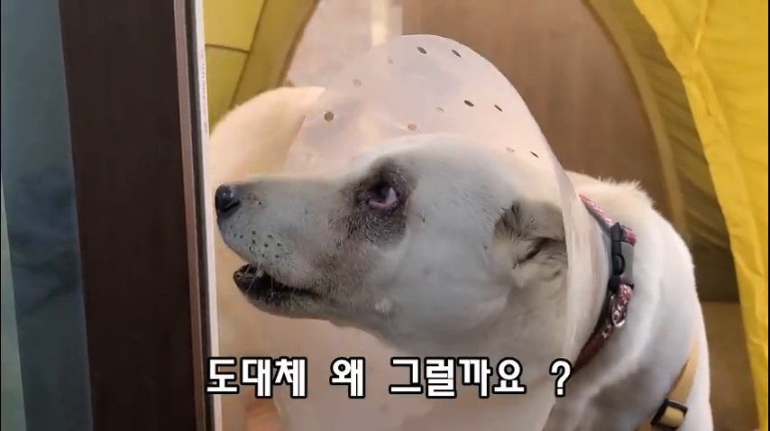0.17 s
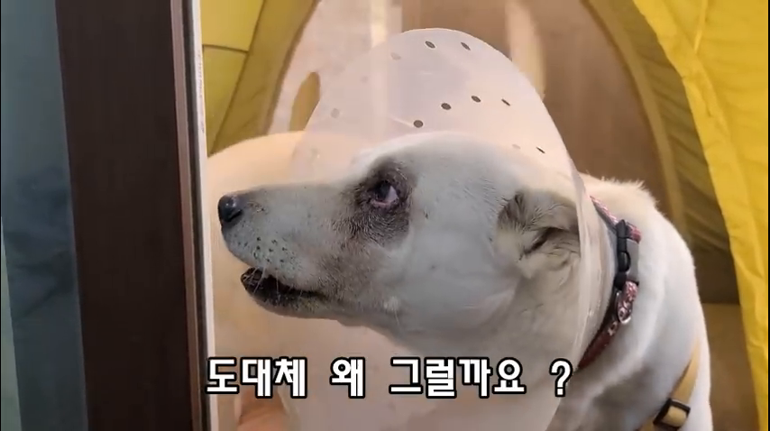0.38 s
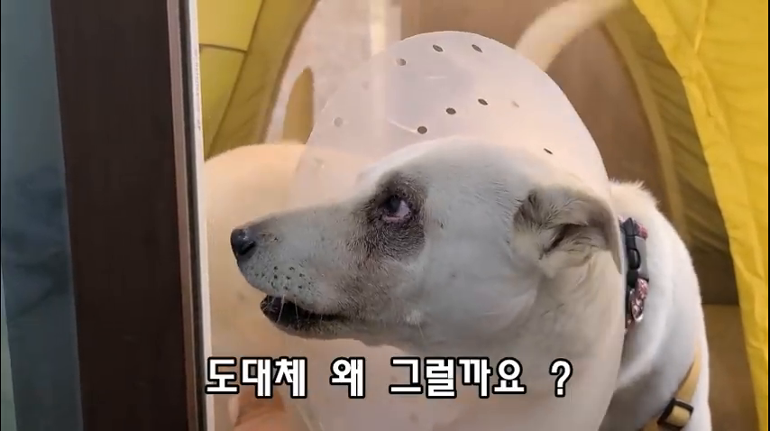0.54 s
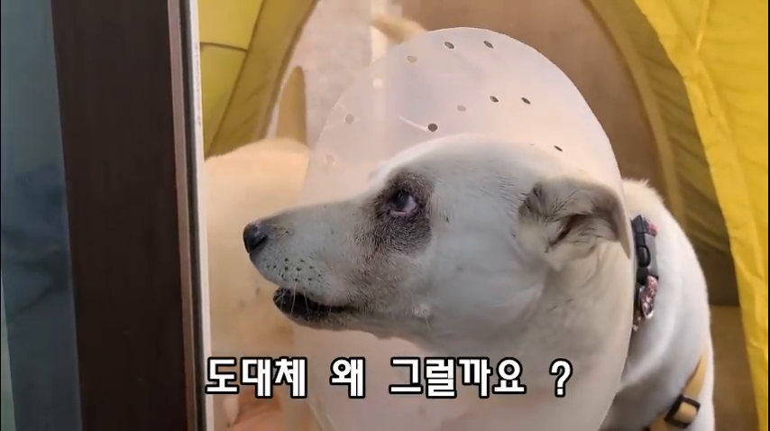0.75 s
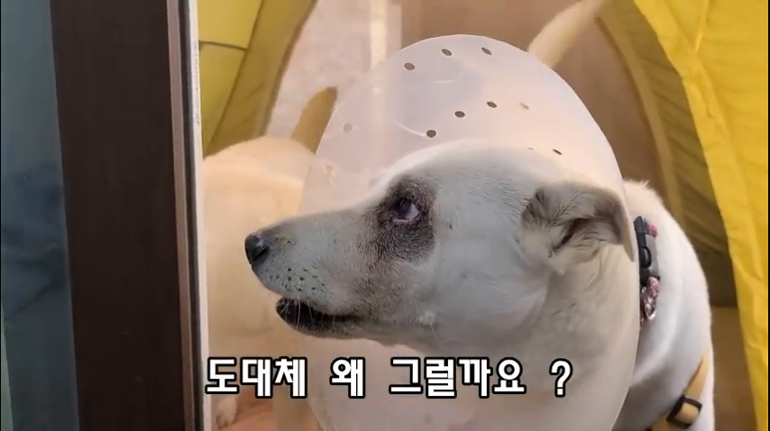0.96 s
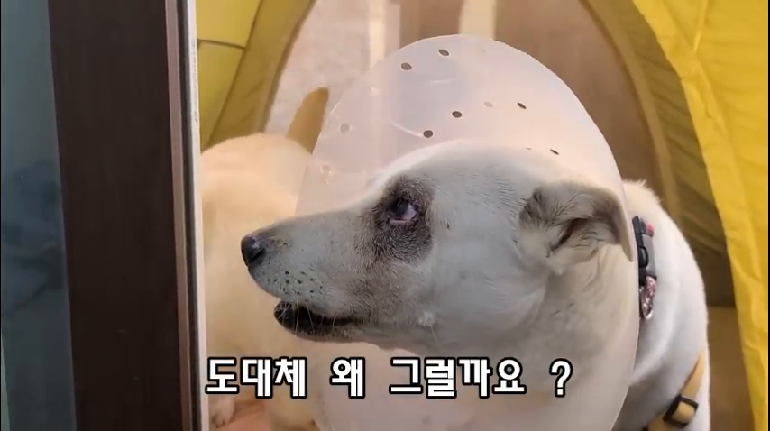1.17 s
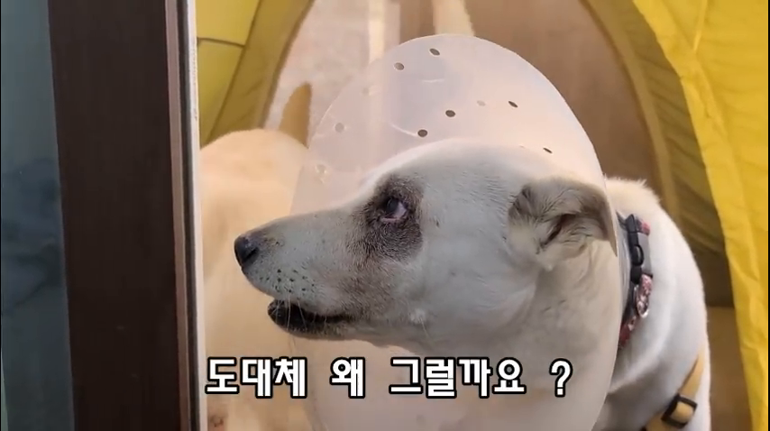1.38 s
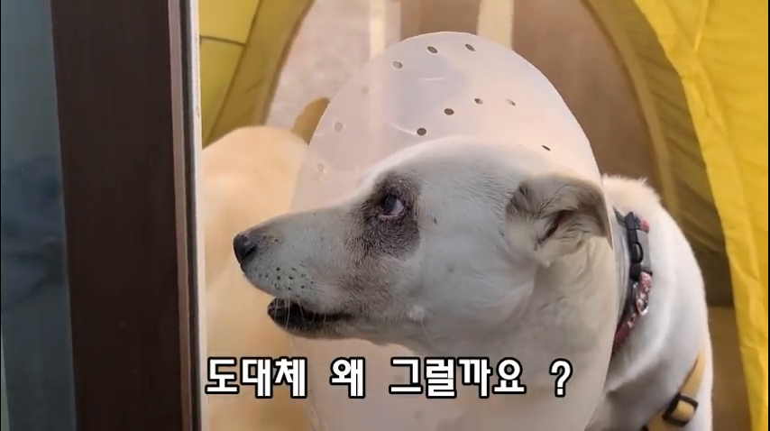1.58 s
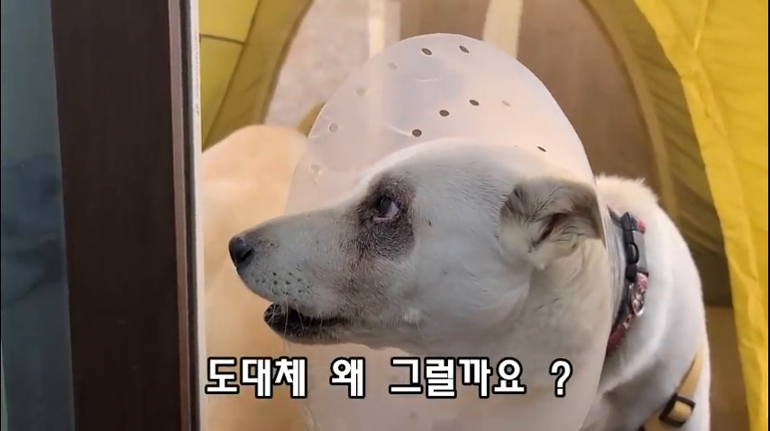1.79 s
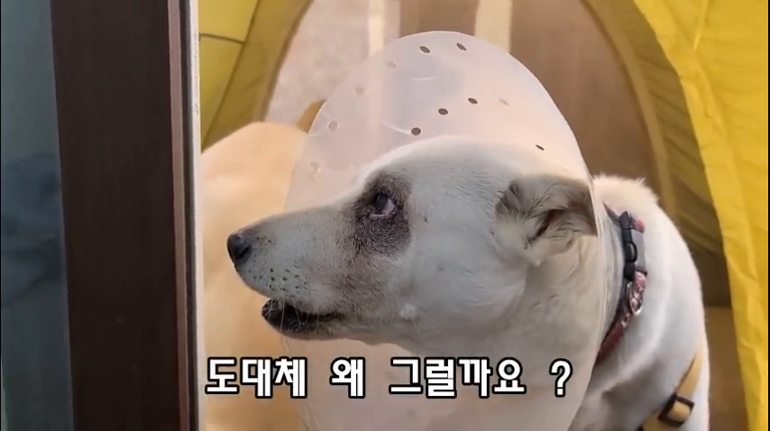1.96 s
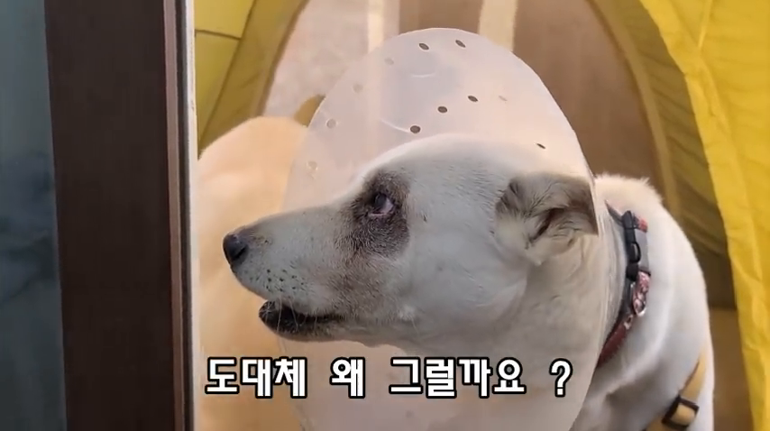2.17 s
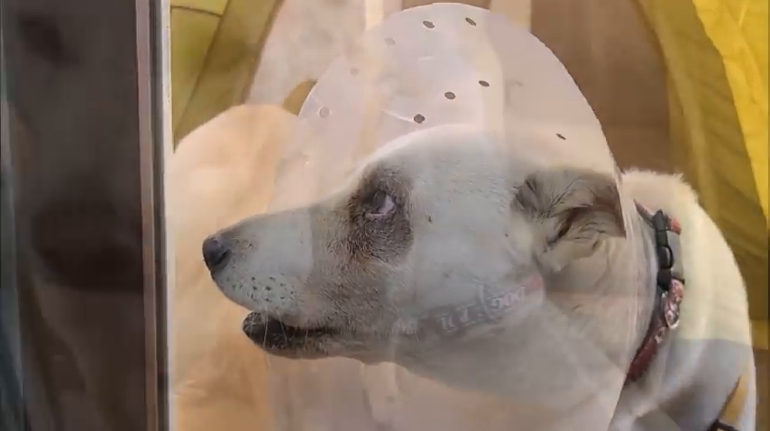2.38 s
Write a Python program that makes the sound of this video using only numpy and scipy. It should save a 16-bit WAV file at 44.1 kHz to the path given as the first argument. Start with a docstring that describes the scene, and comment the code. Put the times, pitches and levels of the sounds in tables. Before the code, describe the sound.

A dog's rising yelp sinks into a moan, followed by a brief fluttering growl.

```python
"""First you hear a dog, close by in a quiet room, grumbling at another dog. Its voice swoops up into one
hissing yelp and sinks to a low moan. It draws air, then gives a short fluttering growl; at 2.33 s the sound
breaks off sharply and the background drops. The voice comes from vocal folds that beat and make the throat and
mouth ring; the hiss is air passing bared teeth. The cone the dog wears scatters the sound, and faint metallic
copies sit in the treble."""
import sys
import numpy as np
from scipy import signal
from scipy.fft import rfft, irfft, next_fast_len
from scipy.io import wavfile
from scipy.ndimage import map_coordinates

SR = 44100
rng = np.random.default_rng(int(sys.argv[2]) if len(sys.argv) > 2 else 0)


def materialize(psi):
    """Save the field psi as 16-bit PCM at rate SR to the path in sys.argv[1].

    A 1-D psi becomes a single channel; in a 2-D psi each row is a channel.
    """
    bounded = np.clip(np.atleast_2d(psi).T, -1, 1)
    quanta = np.round(bounded * 32767).astype(np.int16)
    wavfile.write(sys.argv[1], SR, quanta)


N = 107118


def amp(db):
    """Turn decibels into a gain."""
    return 10 ** (np.asarray(db) / 20)


def unit(x):
    """Scale to an average (rms) size of 1."""
    return x / np.sqrt(np.mean(x ** 2) + 1e-20)


def clock():
    """The time of each sample."""
    return np.arange(N) / SR


def along(points, hz):
    """Read a table between its frequencies, on a log scale."""
    f, v = np.transpose(points)
    return np.interp(np.log(hz + 1), np.log(f + 1), v)


def curves(rows):
    """One value per sample for each column after the time."""
    times, *columns = np.transpose(rows)
    return [np.interp(clock(), times, column) for column in columns]


def wobble(rate):
    """A smooth curve through rate random points a second."""
    return map_coordinates(rng.standard_normal(int(N * rate / SR) + 4), [clock() * rate])


def until(end_s, fade_s):
    """Stay at 1, then fade to reach 0 at end_s."""
    return np.clip((end_s - clock()) / fade_s, 0, 1)


def filtered(x, response):
    """Give each frequency in x the gain response(hz)."""
    size = next_fast_len(N + SR // 2)
    return irfft(rfft(x, size) * response(np.fft.rfftfreq(size, 1 / SR)), size)[..., :N]


# How alike noise is on the left and right: f/Hz, likeness/0-1
AIR_LIKENESS = [(30,.5),(100,0.9),(600,.9),(2000,0.62),(4000,.1),(15000,.1)]
def air(colour, gate=1):
    """Stereo noise, chopped by gate, then given a colour (a level for each frequency)."""
    def response(hz):
        spread = np.arccos(np.clip(along(AIR_LIKENESS, hz), -1, 1)) / 2
        return amp(along(colour, hz)) * [np.cos(spread), np.sin(spread)]
    mid, side = filtered(gate * rng.standard_normal((2, N)), response)
    return unit(np.array([mid + side, mid - side]))


def harmonics(phase, pitch, colour, count, hold_db=-13):
    """One second of tones at multiples of the pitch, kept level except in the colour's deep dips."""
    k = np.arange(1, count + 1)[:, None]
    gains = amp(along(colour, k * pitch[:SR]))
    tone = (gains * np.cos(k * phase[:SR] + k * k / 2)).sum(0)
    strength = np.sqrt(((gains ** 2).sum(0) + amp(hold_db) ** 2) / 2)
    return np.pad(tone / strength, (0, N - SR))


def ring_out(pulses, colour, size=4096):
    """Each pulse sets off a ring of the given colour."""
    cepstrum = irfft(np.log(amp(along(colour, np.fft.rfftfreq(size, 1 / SR)))))
    one_sided = 2 * cepstrum[:size // 2] * (np.arange(size // 2) > 0)  # no ringing before the pulse
    ring = irfft(np.exp(rfft(one_sided, size)))
    return signal.fftconvolve(pulses, ring)[:N]


# Colour of the room's rumble: f/Hz, level/dB
RUMBLE_COLOUR = [(15,-35.5),(25,-10.5),(75,2.5),(110,-7.5),(160,-12.5),(240,-20.5),(340,-18),(450,-13),(690,-27.5),(1200,-29.5),(2500,-29),(4300,-34.5),(6500,-54),(9000,-47),(12000,-42),(15500,-49)]
# Tones of the hum: f/Hz, level/dB
HUM_TONES = [(199.5,-73.5),(283,-77.5),(495,-83)]
def room(rumble_db=-64, drop_db=-14):
    """A low rumble and a faint hum; both drop away as the growl ends."""
    hum = sum(np.sqrt(2) * amp(db) * np.sin(2 * np.pi * hz * clock() + .5 * wobble(2.7))
              for hz, db in HUM_TONES)
    rumble = amp(rumble_db + 1.2 * wobble(8)) * air(RUMBLE_COLOUR)
    return (rumble + hum) * amp(drop_db * (1 - until(2.38, .06)))


# Loudness of the breath in: t/s, level/dB
INHALE_LEVEL = [(0,-100),(.9,-86.5),(1.45,-80.5),(1.6,-70),(1.76,-65.5),(1.84,-70),(1.88,-63),(1.95,-85)]
# Its colour: f/Hz, level/dB
INHALE_COLOUR = [(100,-25.5),(300,-6.5),(500,0.5),(650,-6.5),(850,-16.5),(1600,-18.5),(2100,-20),(2550,-15),(3200,-26.5),(4500,-26),(6000,-42.5),(15000,-45.5)]
def inhale():
    """The dog draws air softly before it growls."""
    level_db, = curves(INHALE_LEVEL)
    return amp(level_db + 1.3 * wobble(35)) * air(INHALE_COLOUR)


# Loudness of the lip noise: t/s, level/dB
LIP_LEVEL = [(.7,-100),(.725,-66),(.745,-58),(.77,-69),(.85,-93),(.9,-110)]
# Its colour: f/Hz, level/dB
LIP_COLOUR = [(300,-11),(1000,0),(1400,2),(2000,-6),(2550,-0.5),(3500,-7.5),(4700,-10),(5400,-7.5),(6000,-20),(15000,-28.5)]
def lips():
    """The lips settle softly as the moan dies."""
    level_db, = curves(LIP_LEVEL)
    return amp(level_db) * air(LIP_COLOUR)


def cone_scatter(voice, level_db=-18, decay_s=.041):
    """The cone collar scatters the voice into a short echo, opposite on the left and right."""
    t = np.arange(SR // 8) / SR
    tail = rng.standard_normal(len(t)) * amp(-60 * t / decay_s)
    echo = signal.fftconvolve(voice.mean(0), tail / np.linalg.norm(tail))[:N]
    return amp(level_db) * echo * np.array([[1], [-1]])


GROWL_S, GROWL_END_S, GROWL_HZ = 1.9245, 2.329, 118.7
# Catches, moments when the throat goes slack: t/s, drop in beat level/dB
CATCHES = [(1.938,0),(1.976,7),(2.004,1.5),(2.039,1.5),(2.071,-1.5),(2.106,9),(2.145,7.5),(2.183,7),(2.219,1),(2.254,3),(2.298,1.5)]
# Colour of the ringing throat: f/Hz, level/dB
THROAT_COLOUR = [(60,-44.5),(170,-16),(240,-12),(295,-21),(345,-12.5),(410,2),(470,0),(525,2),(590,-9),(680,-21.5),(770,-33.5),(920,-24),(1150,-53),(1330,-28),(1600,-48),(1830,-33.5),(2050,-47),(2250,-43),(2500,-46),(3000,-63.5)]
# Colour of the growl's raspy air: f/Hz, level/dB
GROWL_AIR_COLOUR = [(30,-9),(90,1),(300,-1.5),(900,1.5),(1050,-9),(1170,-29.5),(1350,0.5),(1600,-8.5),(1850,-1),(2080,-11),(2250,1),(2550,-19),(3030,-5.5),(3250,-19.5),(3800,-23.5),(5500,-26),(6500,-31),(10000,-34),(15500,-32.5)]
def growl(rise_s=.026, jitter_s=.0003, scatter_db=1.47, catch_s=.0046, lag_s=.0028, recover_s=.02):
    """Uneven beats of the vocal folds ring the throat; at a catch they weaken, lag, then hurry on."""
    t = clock()
    length_s = GROWL_END_S - GROWL_S
    slack_db = sum(depth * np.exp(-((t - s) / catch_s) ** 2) for s, depth in CATCHES)
    swell = (t - GROWL_S) / rise_s
    effort = amp(26 * np.minimum(swell, 0)) * np.clip((swell + 1) * 10, 0, 1)
    beats = GROWL_S + (np.arange(int(length_s * GROWL_HZ) + 6) - 4) / GROWL_HZ
    chance = rng.standard_normal((len(beats), 2))
    lag = sum((beats > s) * np.exp(-abs(beats - s) / recover_s) for s, _ in CATCHES)
    times = beats + jitter_s * chance[:, 0] + lag_s * (lag - .4)
    sizes = amp(scatter_db * chance[:, 1] - np.interp(beats + .003, t, slack_db))
    pulses = np.bincount((times * SR).astype(int), sizes, N)[:N]
    throat = unit(ring_out(pulses, THROAT_COLOUR)) * np.sqrt(length_s * SR / N)
    phase = 2 * np.pi * GROWL_HZ * (t - GROWL_S) + .37 * wobble(50)
    chest = np.sqrt(2) * (np.cos(phase) + amp(-12) * np.cos(2 * phase)) * amp(-.15 * slack_db)
    rasp = air(GROWL_AIR_COLOUR, 1 - .3 * np.cos(phase)) * amp(-.2 * slack_db)
    return effort * (amp(-21.5) * throat + amp(-31) * chest + amp(-43) * np.sqrt(effort) * rasp)


# Loudness of the hiss: t/s, level/dB
HISS_LEVEL = [(0,-48.5),(.03,-59),(.07,-58),(.12,-43),(.14,-35),(.168,-25),(.19,-26.5),(.205,-34),(.23,-33.5),(.27,-49.5),(.31,-61),(.4,-71),(.72,-72.5),(.8,-87.5)]
# Its colour: f/Hz, level/dB
HISS_COLOUR = [(25,-4),(70,-0.5),(150,-9),(600,-9),(1200,-7),(2300,-6),(3200,-3),(6000,-2.5),(9000,-7),(12000,-9),(15500,-15)]
def teeth_hiss(puffs):
    """Puffs of air hiss through the bared teeth."""
    level_db, = curves(HISS_LEVEL)
    return amp(level_db) * air(HISS_COLOUR, puffs)


def voice_crack(phase, at_s=.183, width_s=.014, level_db=-27.5):
    """At the top of the yelp the folds repeat only every second beat, adding a tone an octave down."""
    halves = np.cos(phase / 2) + amp(-8) * np.cos(3 * phase / 2) + amp(-16) * np.cos(5 * phase / 2)
    return amp(level_db) * np.exp(-((clock() - at_s) / width_s) ** 2) * halves


# Loudness of the chest tone while the pitch is low: t/s, level/dB
CHEST_LEVEL = [(0,-42.5),(.104,-35),(.132,-46.5),(.228,-50),(0.269,-41.5),(.4,-39.5),(0.531,-31.5),(.714,-33.5),(.742,-36),(0.767,-55.5),(0.799,-63.5)]
# Its colour: f/Hz, level/dB
CHEST_COLOUR = [(60,12),(115,3.5),(170,-6.5),(245,0),(300,-11),(380,-40),(600,-90)]
def chest_tone(phase, pitch, top_hz=330):
    """The chest hums with the voice, fading when the pitch passes top_hz."""
    level_db, = curves(CHEST_LEVEL)
    return amp(level_db) * harmonics(phase, pitch, CHEST_COLOUR, count=3) / (1 + (pitch / top_hz) ** 10)


# Pitch of the voice: t/s, f/Hz
PITCH = [(0,188.1),(.042,164.6),(.078,185.2),(.1,225.4),(.113,256.1),(.126,371.7),(.138,467.6),(.15,546),(.165,562.7),(.184,598.4),(.207,616.2),(.222,513),(.24,345.3),(.26,202),(.28,171.3),(.302,154.7),(.37,141.2),(.448,130.4),(.604,119.9),(.718,110.9),(.775,92.1)]
# How rough the voice is: t/s, roughness/0-1
ROUGHNESS = [(0,0.22),(0.048,0.09),(.1,0.15),(.128,0.41),(0.144,0.04),(.21,.01),(.24,.08),(.265,0.32),(.31,0.09),(.41,0.08),(.445,0.39),(.52,0.2),(.57,.06),(.605,0.26),(.64,0.1),(0.699,0.1),(.75,0.64)]
# Loudness of the mouth's ring: t/s, level/dB
MOUTH_LEVEL = [(0,-13.5),(0.021,-33),(.055,-30),(.08,-17),(.1,-13.5),(.113,-12.5),(.125,-19.5),(.134,-10.5),(.144,-5.5),(.16,-6),(0.195,-8),(0.206,-19.5),(.213,-7),(.222,-9),(.23,-18),(.248,-20),(.264,-16.5),(.287,-27),(.41,-26),(0.509,-29.5),(0.601,-35.5),(0.636,-28.5),(0.709,-29),(.74,-42),(.78,-59.5),(.83,-65.5)]
# Its colour: f/Hz, level/dB
MOUTH_COLOUR = [(150,-74),(270,-31),(340,-11.5),(400,-3.5),(470,3.5),(540,-5.5),(610,-8),(665,-27),(760,-35),(880,-35.5),(1050,-59.5),(2000,-100)]
# Bright parts of the voice: t/s, overtone level/dB, rasp level/dB (before a 2.5 dB lift)
BRIGHT_LEVELS = [(0,-40.5,-48),(.056,-49,-58.5),(.098,-39,-43.5),(.12,-25,-28.5),(.133,-18,-21),(.143,-20,-31),(.154,-23,-26),(.164,-45.5,-28.5),(.186,-33.5,-30.5),(.204,-25.5,-28.5),(.215,-31.5,-35.5),(.226,-24.5,-34),(.246,-39,-44.5),(.27,-38,-50),(.316,-50,-62),(.38,-59.5,-65),(.56,-66.5,-62),(.66,-63.5,-62),(.78,-63.5,-64),(.82,-75,-74.5)]
# Overtone colours, mouth open and shut: f/Hz, level/dB
OVERTONES_OPEN = [(550,-58.5),(760,-13),(930,-9),(1035,4.5),(1095,-9.5),(1160,-20.5),(1240,-10),(1330,-6),(1450,-23.5),(1600,-35.5),(2500,-70)]
OVERTONES_SHUT = [(550,-51.5),(760,-6.5),(880,-3),(990,0),(1080,-18.5),(1170,-20.5),(1330,-7),(1450,-15),(1600,-29),(2500,-70)]
# Rasp colours, mouth open and shut: f/Hz, level/dB
RASP_OPEN = [(1000,-60.5),(1450,-18),(1680,1),(1850,-6),(2000,-15),(2230,-8.5),(2380,-13.5),(2530,1.5),(2700,-15),(3000,-15),(3300,-25),(4500,-41.5)]
RASP_SHUT = [(1000,-50),(1600,-13.5),(1760,-9.5),(1850,2),(1950,-13.5),(2300,-15.5),(2430,-6.5),(2540,2.5),(2680,-8.5),(3050,-10),(3500,-20.5),(4500,-36)]
def yelp_and_moan(shut_hz=149, open_hz=246):
    """The vocal folds speed up into a yelp and slow to a moan; the mouth opens as the pitch rises."""
    (pitch,), (rough,), (mouth_db,) = map(curves, (PITCH, ROUGHNESS, MOUTH_LEVEL))
    overtone_db, rasp_db = curves(BRIGHT_LEVELS)
    jitter = (.0052 + .032 * rough) * wobble(200)
    phase = 2 * np.pi * np.cumsum(pitch * (1 + jitter)) / SR
    puffs = 1 + .55 * np.cos(phase)  # one puff of air per beat
    opening = np.clip((pitch - shut_hz) / (open_hz - shut_hz), 0, 1)

    def voiced(colour, breath, count):
        """Mix a tone with puffing breath of the same colour."""
        tone = harmonics(phase, pitch, colour, count)
        return (tone + breath * air(colour, puffs)) / np.hypot(1, breath)

    mouth = amp(mouth_db) * voiced(MOUTH_COLOUR, .98 * rough, count=9)
    mouth *= 1 + .9 * rough * wobble(160)  # a rough voice flickers in level
    breath = .22 + .28 * rough
    overtones = opening * voiced(OVERTONES_OPEN, breath, count=10)
    overtones += (1 - opening) * voiced(OVERTONES_SHUT, 3 * breath, count=14)
    rasp = opening * voiced(RASP_OPEN, .28 + 1.8 * rough, count=16)
    rasp += (1 - opening) * voiced(RASP_SHUT, .7 + rough, count=28)
    bright = amp(overtone_db) * overtones + amp(rasp_db + 2.5) * rasp
    voice = chest_tone(phase, pitch) + mouth + bright + voice_crack(phase) + teeth_hiss(puffs)
    fade_in = 1 - until(.0043, .0041)
    return voice * fade_in * until(.85, .04)


def scene():
    """The dog in its cone, in the room; the sound breaks off sharply at the end of the growl."""
    voice = yelp_and_moan() + growl()
    dog = (voice + cone_scatter(voice)) * until(GROWL_END_S, .00086)
    return dog + lips() + inhale() + room()


# Metallic copies around 1, 2, 3 and 4 times copy_hz: level/dB
COPY_LEVELS = [-40.5,-46.5,-48,-52.5]
# How much louder the left side is: f/Hz, level/dB
LEFT_BOOST = [(100,-0.45),(500,0),(1100,4.5),(1700,-1),(2500,-7.5),(4000,-0.5),(7000,-2),(10000,-3.5),(15000,-2)]
# How far the left side's wave is ahead: f/Hz, phase/radians
LEFT_LEAD = [(100,0),(500,0.52),(1000,.5),(1700,1.41),(2500,2.5),(3400,2.2),(15000,-3.04)]
def record(dry, copy_hz=3900, top_hz=15800):
    """Two microphone openings colour the sound; the low voice is mirrored faintly into the treble."""
    low_colour = [(200, -16.5), (380, -1.5), (650, 2.5), (900, -19.5), (1500, -60.5)]  # f/Hz, level/dB
    low = filtered(dry.mean(0), lambda hz: amp(along(low_colour, hz)))
    copies = low * sum(2 * amp(db) * np.cos(2 * np.pi * copy_hz * k * clock())
                       for k, db in enumerate(COPY_LEVELS, 1))
    sides = np.array([[1], [-1]]) / 2
    balance = lambda hz: amp(sides * along(LEFT_BOOST, hz))
    lead = lambda hz: np.exp(1j * sides * along(LEFT_LEAD, hz))
    stereo = filtered(dry, lambda hz: balance(hz) * lead(hz))
    return filtered(np.clip(stereo + copies, -1, 1), lambda hz: hz < top_hz)


dry = scene()
out = record(dry)
materialize(out)
```